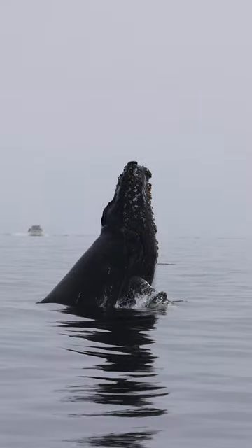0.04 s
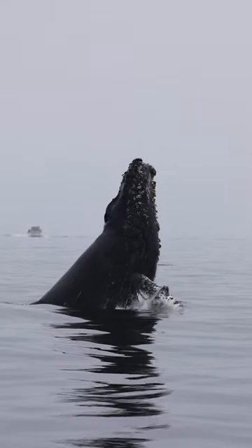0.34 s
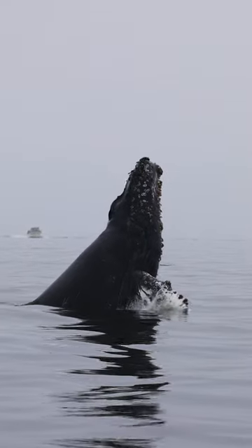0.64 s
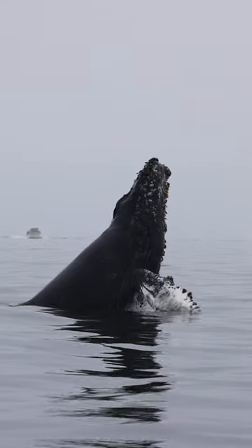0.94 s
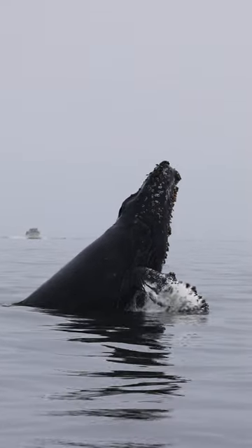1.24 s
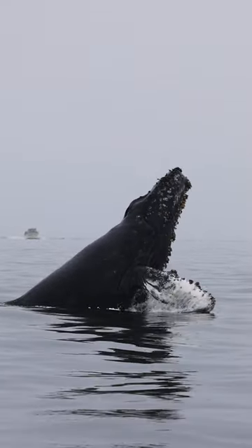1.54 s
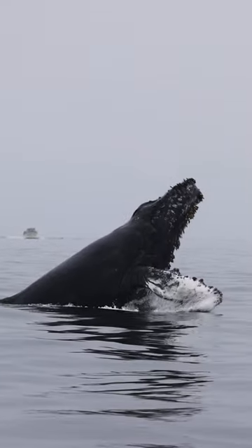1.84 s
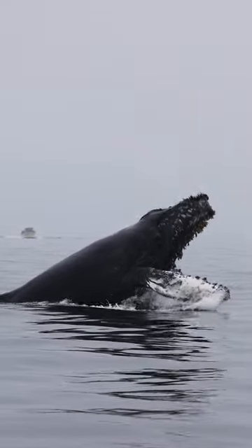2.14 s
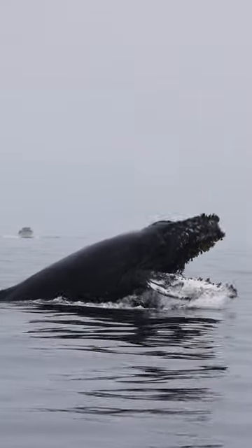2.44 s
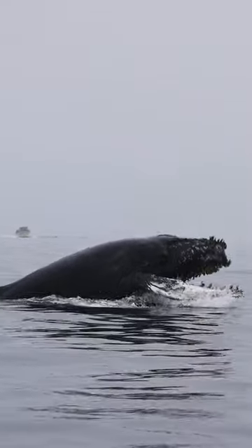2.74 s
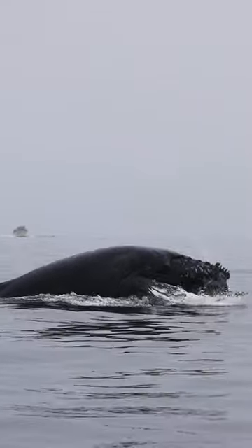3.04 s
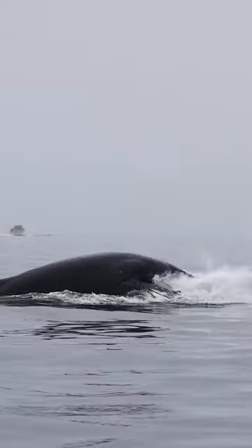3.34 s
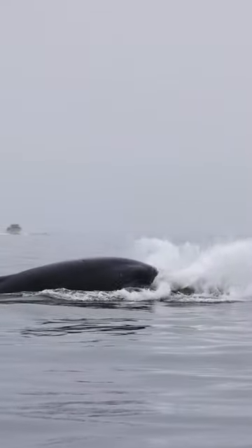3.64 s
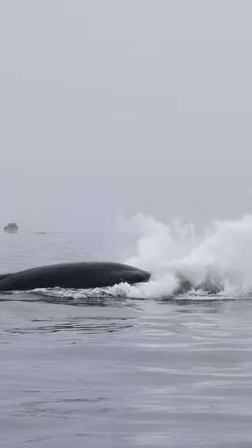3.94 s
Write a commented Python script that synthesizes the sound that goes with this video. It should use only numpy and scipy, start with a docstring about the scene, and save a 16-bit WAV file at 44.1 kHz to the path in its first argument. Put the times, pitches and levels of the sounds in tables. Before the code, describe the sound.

Water pours, bubbles and drips off a rising whale, thinning to a trickle. Then comes a hard chin slap with a deep thump and falling spray, picked up in stereo from a boat over low wind and sea rumble.

```python
"""A whale calf on a calm sea, heard from a boat through a stereo microphone.
Over low wind and water rumble and faint microphone hiss the calf rears up, and water pours off its body,
churning with bubbles and drips. The pouring eases and thin streams trickle off a flipper. Near 3.3 s the
chin lands in a quick run of hard slaps over a deep thump of trapped air, and the spray rains back."""
import sys
import numpy as np
from scipy import signal
from scipy.fft import rfft, irfft
from scipy.io import wavfile

SR = 44100
rng = np.random.default_rng(int(sys.argv[2]) if len(sys.argv) > 2 else 0)


def master_out(mix):
    """Clip the mix to full scale and print it as 16-bit PCM to the path in sys.argv[1]."""
    frames = np.transpose(np.atleast_2d(mix))
    ceiling = np.clip(frames, -1, 1)
    pcm = np.round(ceiling * 32767).astype(np.int16)
    wavfile.write(sys.argv[1], SR, pcm)


N = 176400
T = np.arange(N) / SR
CUTOFF_HZ = 15600
DROPLET_CYCLES = 17  # to fade by 60 dB

# How alike the water by the whale sounds left and right. Each row: frequency in Hz, likeness 0 to 1.
WATER_LIKENESS = [(100, 0.97), (500, 0.9), (1000, 0.93), (2000, 0.94), (4000, 1), (8000, 0.28), (14000, 1)]


def from_db(db):
    """Decibels to gain."""
    return 10 ** (np.asarray(db) / 20)


def unit_rms(x):
    """Scale to an rms of 1."""
    return x / np.sqrt(np.mean(x ** 2) + 1e-20)


def in_time(rows):
    """Each column of a timed curve at every sample."""
    times, *columns = np.transpose(rows)
    return [np.interp(T, times, column) for column in columns]


def at_hz(points, hz):
    """Read a curve on a log-frequency axis."""
    freqs, values = np.transpose(points)
    return np.interp(np.log(hz), np.log(freqs), values)


def pan(db):
    """Left and right gains for a level difference."""
    return from_db(np.array([[.5], [-.5]]) * db)


def butter(x, order, hz, kind):
    """Causal Butterworth filter."""
    return signal.sosfilt(signal.butter(order, hz, kind, fs=SR, output="sos"), x)


def resonate(x, peaks):
    """Add resonances, each given as frequency in Hz, added gain, width in Hz."""
    return x + sum(boost * signal.lfilter(*signal.iirpeak(hz, hz / width_hz, fs=SR), x)
                   for hz, boost, width_hz in peaks)


def drift(rate_hz):
    """Slow random wander with an rms of 1."""
    hop, settle = 40, 2000
    pole = np.exp(-2 * np.pi * rate_hz * hop / SR)
    white = rng.standard_normal(N // hop + settle + 2)
    slow = signal.lfilter([1], [1, -2 * pole, pole * pole], white)[settle:]
    return np.interp(np.arange(N) / hop, np.arange(len(slow)), unit_rms(slow))


def banded_noise(spectrum, likeness, patchy_db, flicker_hz):
    """Stereo noise in narrow bands, each flickering partly alone and partly with the rest; rms 1."""
    edges = np.geomspace(22, 17000, 25)
    out, together, white = 0, drift(flicker_hz), rng.standard_normal((2, 2, N))
    for k, band in enumerate(zip(edges, edges[1:])):
        hz, own = np.sqrt(band[0] * band[1]), drift(flicker_hz)
        if not spectrum[0][0] / 2 < hz < spectrum[-1][0] * 2:
            continue
        mid, side = butter(white[k % 2], 2, band, "band")
        alike = np.clip(at_hz(likeness, hz), 0, 1)
        gain = from_db(at_hz(spectrum, hz) + patchy_db * (.5 * together + own))
        out += gain * (np.sqrt(1 + alike) * mid + np.sqrt(1 - alike) * side * [[1], [-1]])
    return unit_rms(out)


def colour(x, spectrum, size=4096):
    """Minimum-phase filter with the given spectrum and unit power gain."""
    freqs = np.arange(size // 2 + 1) * SR / size + 1
    cepstrum = irfft(np.log(from_db(at_hz(spectrum, freqs))))
    cepstrum[1:size // 2] *= 2
    cepstrum[size // 2 + 1:] = 0
    response = irfft(np.exp(rfft(cepstrum)))
    return signal.fftconvolve(x, response / np.linalg.norm(response))[:N]


def even_noise(spectrum, top_hz):
    """Coloured noise with its level evened out, so that a short burst keeps its strength."""
    phase = np.angle(signal.hilbert(colour(rng.standard_normal(N), spectrum)))
    return butter(np.sqrt(2) * np.cos(phase), 3, top_hz, "low")


def bubbles(per_s, low_hz, high_hz, spread_db, tilt_db, width_db, cycles=DROPLET_CYCLES, pitches=24):
    """Bubbles of random strength, pitch and place, each ringing briefly; tilt is per octave; rms 1."""
    strengths = from_db(spread_db * np.minimum(rng.exponential(1, N), 4)) * rng.choice([-1, 1], N)
    clicks = strengths * (rng.random(N) < per_s / SR) * pan(width_db * rng.standard_normal(N))
    out, pitch_index = 0, rng.integers(0, pitches, N)
    for k, hz in enumerate(np.geomspace(low_hz, high_hz, pitches)):
        radius = from_db(-60 * hz / (cycles * SR))
        feedback = [1, -2 * radius * np.cos(2 * np.pi * hz / SR), radius ** 2]
        ring = signal.lfilter([1, 0, -1], feedback, clicks * (pitch_index == k) + 1e-18)
        out += from_db(tilt_db * np.log2(hz / low_hz)) * ring
    return unit_rms(out)


def background():
    """Steady background: low wind and water rumble with faint microphone hiss."""
    # Each row: frequency in Hz, relative level in dB.
    spectrum = [(25, 8), (70, 7), (200, 9), (700, -2), (2000, 2), (5000, -14), (11000, -28), (15500, -22)]
    # Each row: frequency in Hz, likeness of left and right from 0 to 1.
    likeness = [(30, 0.23), (200, 0.28), (1000, 0.3), (4000, .2), (12000, 0.066)]
    return from_db(-55) * banded_noise(spectrum, likeness, patchy_db=4, flicker_hz=3.1)


def churn():
    """Low rumble of the water that the body pushes aside."""
    # Each row: time in seconds, relative level in dB.
    levels = [(0, -63), (.6, -53.5), (.7, -46), (.82, -58), (.92, -51), (1.1, -64), (1.6, -54.5),
              (3.1, -58), (3.23, -39.5), (3.37, -41), (3.56, -41), (3.66, -55), (3.77, -57), (4, -59)]
    # Each row: frequency in Hz, relative level in dB.
    spectrum = [(25, -26), (45, -19), (68, -4.5), (120, 1), (170, -4), (260, -4.5), (500, -34)]
    rumble = banded_noise(spectrum, WATER_LIKENESS, patchy_db=1.4, flicker_hz=3.4)
    return from_db(in_time(levels)[0] - 2.5) * rumble


def falling_drops():
    """Thin streams trickle off the flipper as the whale leans over; fine spray rains after it lands."""
    # Each row of both: time in seconds, level in dB.
    trickle_levels = [(1.5, -80), (1.9, -64), (2.3, -64), (2.7, -73), (3.1, -74.5)]
    spray_levels = [(3.3, -80), (3.52, -61), (3.8, -59.5), (4, -64)]
    trickle = bubbles(350, 3450, 4800, spread_db=2, tilt_db=-7, width_db=5, pitches=8)
    spray = bubbles(7600, 5700, 8000, spread_db=1, tilt_db=-5, width_db=9, pitches=8)
    return from_db(in_time(trickle_levels)[0]) * trickle + from_db(in_time(spray_levels)[0]) * spray


def sloshes():
    """Water folds over into hollows, each a short rush around the pitch of its cavity."""
    # Each row: crest time in seconds, level in dB, pitch in Hz, swell and release in seconds.
    hollows = [(.7, -46.5, 122, .02, 0.041), (.82, -41.5, 230, 0.02, 0.022),
               (.92, -44.5, 163, 0.029, 0.041), (1.145, -37, 620, 0.037, 0.024),
               (1.75, -53.5, 283, 0.031, 0.017), (2.2, -51.5, 403, 0.036, 0.044),
               (3.33, -44, 75.5, 0.011, 0.064), (3.755, -45, 251, 0.044, .025),
               (3.795, -39.5, 620, 0.024, 0.018)]
    out, edges_oct = 0, np.array([-.45, .45])
    for crest_s, db, hz, swell_s, release_s in hollows:
        rush = unit_rms(butter(rng.standard_normal(N), 2, hz * 2 ** edges_oct, "band"))
        width_s = np.where(T < crest_s, swell_s, release_s)
        out += from_db(db) * np.exp(-((T - crest_s) / width_s) ** 2 / 2) * rush
    return out


def drips():
    """Single clear drips, each a ringing pocket of air whose pitch rises as it nears the surface."""
    # Each row: start in seconds, level in dB, starting pitch in Hz.
    drops = [(.785, -29.5, 1610), (0.877, -27.5, 1530), (.924, -38, 12000), (1.35, -45, 13500),
             (1.769, -36.5, 2240), (2.247, -38, 3100), (2.993, -46, 10700)]
    out, ring_cycles, rise_per_s = 0, 41, 1.9
    for start_s, db, hz in drops:
        age = np.maximum(T - start_s, 0)
        envelope = (1 - np.exp(-age * hz)) * from_db(db - 60 * age * hz / ring_cycles)
        out += envelope * np.sin(2 * np.pi * hz * age * (1 + rise_per_s * age / 2))
    return out


def pouring_water():
    """Pouring and falling water: a bubbling wash, splatter in the upper mids and a fizz of droplets."""
    # Water runs off the body, then falls back after the slap.
    # Each row: time in seconds, then relative levels of wash, splatter and fizz in dB.
    runoff = [(0, -58, -64, -65), (.1, -55.5, -69, -64.5), (.36, -46.5, -53, -60.5),
              (.62, -42.5, -48.5, -55.5), (.84, -37, -42.5, -50), (.92, -38.5, -42.5, -52.5),
              (1.04, -38.5, -47, -55.5), (1.16, -38.5, -43.5, -51), (1.23, -42, -48.5, -56.5),
              (1.65, -48.5, -57, -61.5), (2.05, -48, -59, -61.5), (2.35, -47, -58.5, -61.5),
              (2.9, -48.5, -55.5, -62), (3.23, -44.5, -50.5, -57.5)]
    fallback = [(3.38, -43, -50, -57.5), (3.538, -41.5, -47.5, -52.5), (3.69, -44, -46.5, -56.5),
                (3.808, -40, -48, -54.5), (3.97, -45, -47, -58)]
    # Where the wash lies from the boat. Each row: time in seconds, left minus right in dB.
    wash_pan = [(0, -.7), (.8, -1.3), (1.3, 2), (1.75, 5.5), (2.3, 5.5), (2.8, 1.5), (3.3, .2), (3.8, 2.3)]
    # Each row of all three: frequency in Hz, relative level in dB.
    wash_spectrum = [(110, -13), (200, -3.5), (350, -3), (600, 0.5), (1050, -2.5), (1600, -7), (2500, -34),
                     (5000, -56)]
    splatter_spectrum = [(900, -11), (1500, -2), (2200, 2.5), (3000, -2.5), (4200, -11), (6500, -25.5)]
    fizz_spectrum = [(2500, -5), (4300, 3), (5600, -2.5), (7200, 1), (9000, -8), (11000, -7.5), (13000, -8),
                     (15500, -16)]
    wash = from_db(-.5) * banded_noise(wash_spectrum, WATER_LIKENESS, patchy_db=1.02, flicker_hz=21.8)
    wash += from_db(-4.5) * bubbles(380, 262, 1476, spread_db=3, tilt_db=1, width_db=11.5, cycles=8.5)
    wash *= pan(in_time(wash_pan)[0])
    splatter = from_db(-2.5) * banded_noise(splatter_spectrum, WATER_LIKENESS,
                                            patchy_db=.7, flicker_hz=30)
    splatter += from_db(-11.5) * bubbles(500, 1565, 4230, spread_db=.5, tilt_db=9.5, width_db=5)
    fizz = from_db(-1.5) * banded_noise(fizz_spectrum, WATER_LIKENESS, patchy_db=1.7, flicker_hz=30)
    fizz += from_db(-9) * bubbles(700, 5050, 11200, spread_db=4, tilt_db=1, width_db=3)
    wash_db, splatter_db, fizz_db = in_time(list(runoff) + list(fallback))
    return from_db(wash_db) * wash + from_db(splatter_db) * splatter + from_db(fizz_db) * fizz


def chin_slap():
    """Each contact is a push-pull pulse, a dull smack and a crack of collapsing water; trapped air rings."""
    # Parts of the jaw meet the water. Each row: start in seconds, relative level in dB,
    # extra level of the crack in dB, length of the pressure pulse in seconds.
    contacts = [(3.2746, -18.5, 0, 0.0019), (3.2806, -22.5, 7, 0.0021), (3.2837, -3.5, -5, .002),
                (3.293, -14, -9, 0.0019), (3.299, -4.5, -5, 0.0038), (3.3033, -12, -1, 0.0013),
                (3.3072, -13.5, -15, 0.0029), (3.3119, -12.5, -12, 0.0051), (3.33, -15.5, -7, 0.0021)]
    # Each row of both: frequency in Hz, relative level in dB.
    smack_spectrum = [(70, -19), (115, 0.5), (160, 0.5), (290, 1), (420, -2.5), (540, 4), (640, -1),
                      (740, -30), (1100, -6.5), (2000, -23.5)]
    crack_spectrum = [(500, -13.5), (950, 0), (1250, -7.5), (1520, 4), (1850, -7.5), (2230, -0.5),
                      (2600, -7.5), (3400, -20), (4400, -20.5), (5200, -37), (12000, -56)]
    # Air trapped under the jaw. Each row: pitch in Hz, added gain, width in Hz.
    air_pockets = [(116, 0.33, 12), (154, 1.3, 12), (230, .35, 28), (289, 0.52, 39), (525, 0.67, 22),
                   (620, .7, 65)]
    attack_s, smack_decay_s, crack_decay_s, spatter_decay_s = .00029, .0091, .0043, .022
    pulses, smack, crack = 0, 0, 0
    for start_s, db, crack_db, length_s in contacts:
        pulse_time = 4 * (T - start_s) / length_s - 2
        pulses -= from_db(db - 3) * pulse_time * np.exp((1 - pulse_time ** 2) / 2)
        age = np.maximum(T - start_s, 0)
        onset = from_db(db) * (1 - np.exp(-age / attack_s))
        smack += from_db(-10.5) * onset * np.exp(-age / smack_decay_s)
        spatter = from_db(-19.5) * np.exp(-age / spatter_decay_s)  # trails each crack
        crack += from_db(crack_db - 10) * onset * (np.exp(-age / crack_decay_s) + spatter)
    mid, side = (smack * even_noise(smack_spectrum, top_hz=950)
                 + crack * even_noise(crack_spectrum, top_hz=3520) for _ in range(2))
    slap = pulses + mid + from_db(-46) * side * [[1], [-1]] + 1e-18
    return butter(resonate(slap, air_pockets), 4, 117, "high")


def scene():
    """The whale over the background, in the open air."""
    return pouring_water() + drips() + falling_drops() + sloshes() + churn() + chin_slap() + background()


def record(dry):
    """The microphone adds two mild treble peaks, hears the left a little late and cuts the top steeply."""
    # Its broad resonances. Each row: frequency in Hz, added gain, width in Hz.
    mic_peaks = [(7500, 0.26, 1800), (10800, 0.45, 920)]
    left_lag_s = .000015
    left, right = resonate(dry, mic_peaks)
    freqs = np.arange(N // 2 + 1) * SR / N
    late_left = irfft(rfft(left) * np.exp(-2j * np.pi * freqs * left_lag_s), N)
    top_cut = signal.ellip(12, .1, 90, CUTOFF_HZ, fs=SR, output="sos")
    return signal.sosfilt(top_cut, np.array([late_left, right]))


dry = scene()
out = record(dry)
master_out(out)
```